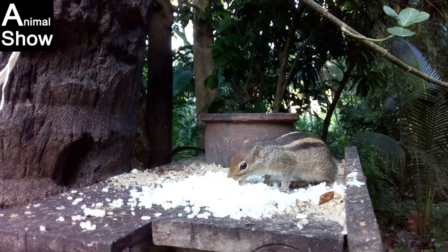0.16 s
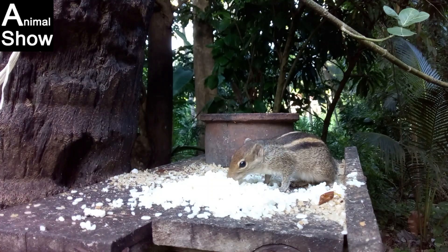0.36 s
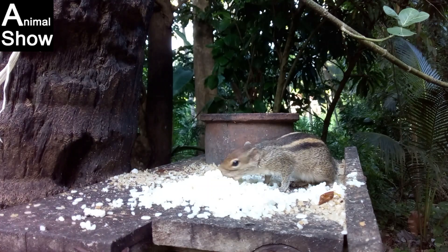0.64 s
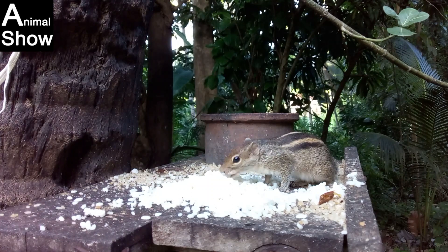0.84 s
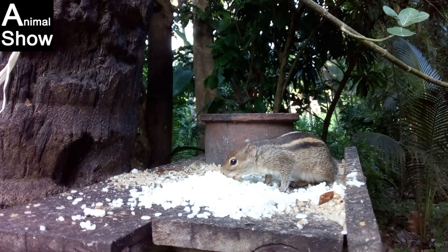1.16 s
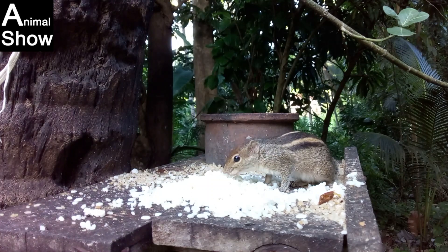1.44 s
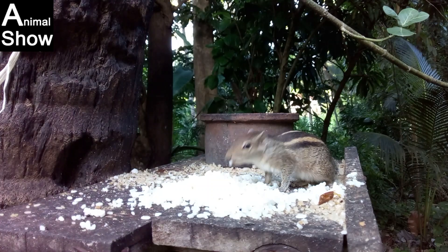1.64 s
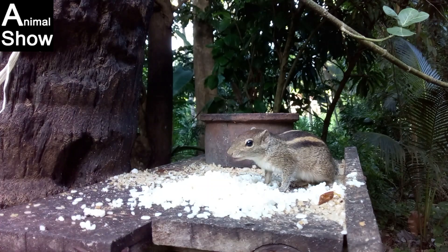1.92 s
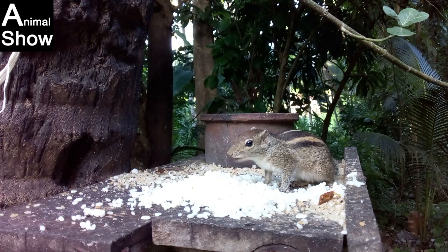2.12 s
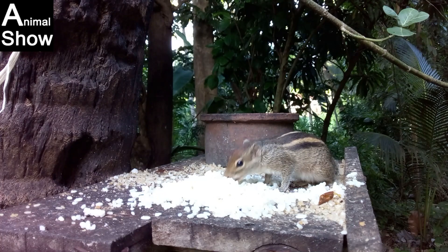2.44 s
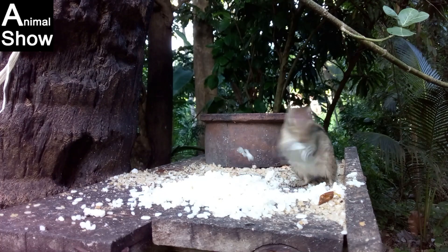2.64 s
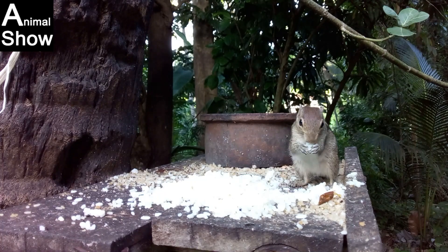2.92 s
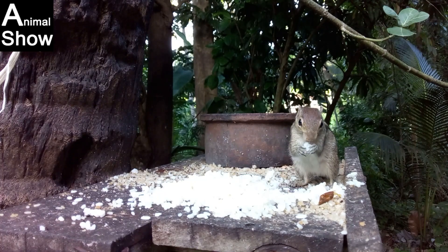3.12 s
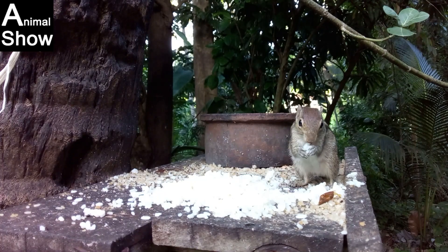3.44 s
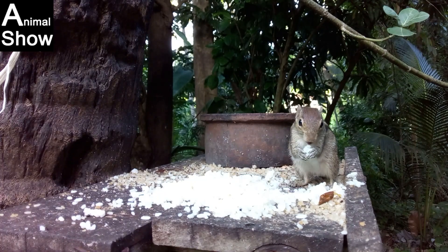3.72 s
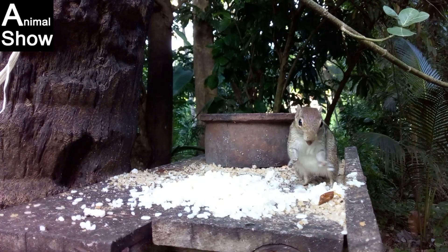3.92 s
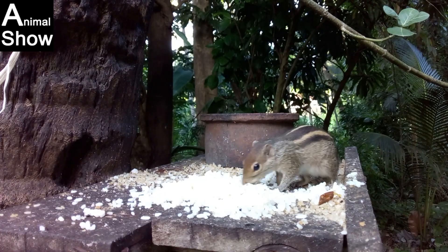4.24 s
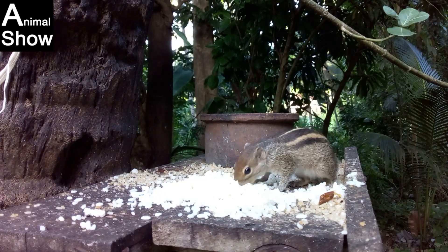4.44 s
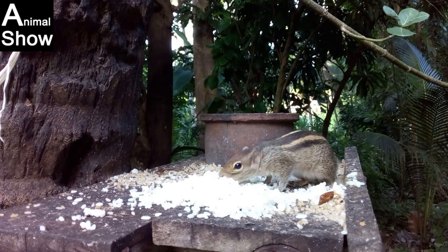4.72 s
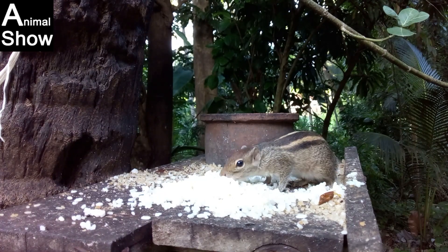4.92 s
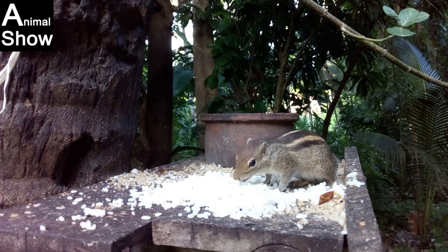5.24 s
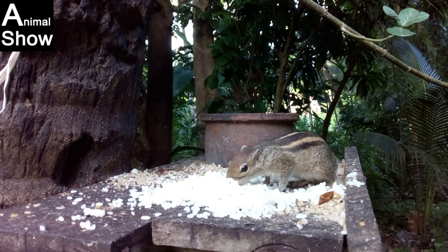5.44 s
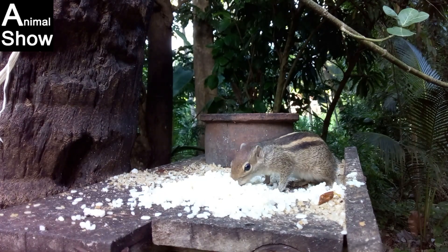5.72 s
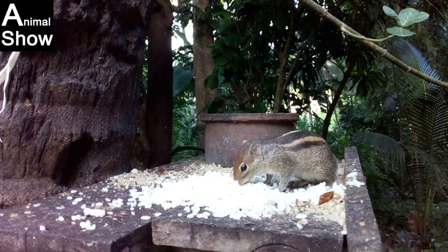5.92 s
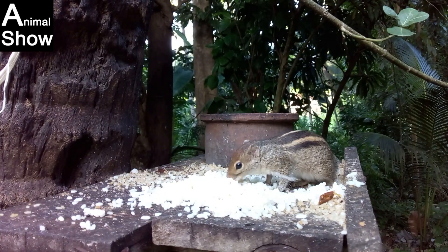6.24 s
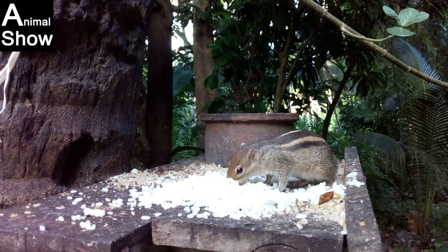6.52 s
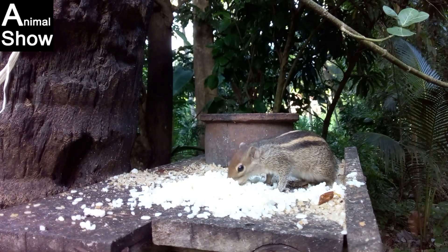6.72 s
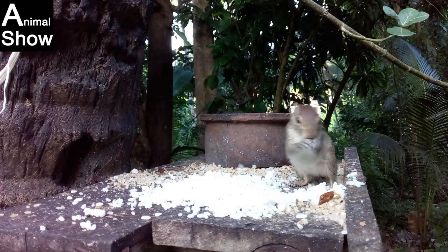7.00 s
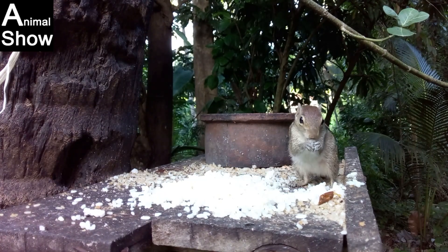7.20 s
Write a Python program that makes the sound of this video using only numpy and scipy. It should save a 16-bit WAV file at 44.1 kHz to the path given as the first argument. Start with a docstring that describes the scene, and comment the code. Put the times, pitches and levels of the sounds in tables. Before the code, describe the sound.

A small squirrel repeats one high chirp two or three times a second in a quiet garden. Each chirp flicks upward, echoes off hard surfaces and rings briefly in the leaves. Faint insects buzz over a low outdoor rumble. Distant birds join with thin whistles, and a few grains tick on a feeding table. The squirrel stops shortly before the end, leaving the birds.

```python
"""From the start, a small squirrel repeats one high chirp in a quiet garden, over buzzing insects and a
low outdoor rumble. Each chirp flicks upward and lands on a short, steady whistle; then walls and trunks
throw it back and the leaves let it ring on. After about two and a half seconds, small birds begin to
whistle far off. A grain ticks on a feeding table near three seconds, and three more around six.
The squirrel stops shortly before the end, and the birds have the last notes."""
import sys
import numpy as np
from scipy import signal
from scipy.fft import rfft, irfft
from scipy.io import wavfile

SR = 44100
rng = np.random.default_rng(int(sys.argv[2]) if len(sys.argv) > 2 else 0)


def file_out(sig):
    """Save sig as 16-bit WAV at sys.argv[1]."""
    # one column per channel
    cols = np.atleast_2d(sig).T
    # limit, then scale
    lim = np.clip(cols, -1, 1)
    pcm = np.round(lim * 32767).astype(np.int16)
    wavfile.write(sys.argv[1], SR, pcm)


N = 325015
TIME = np.arange(N) / SR

# The squirrel's chirps. Each row: start in seconds, level in dB compared with the other chirps.
CHIRPS = [(-0.21, 0.5), (0.1359, -1.5), (0.4678, -0.7), (0.768, -0.3), (1.0551, -0.4), (1.4062, -0.7),
          (1.784, -1), (2.227, -1.4), (2.7753, -2.0), (3.218, -1.8), (3.9197, -1.7), (4.2885, -0.8),
          (4.6603, 0), (5.0673, -0.6), (5.6511, -0.5), (6.2593, -1), (6.6265, -1.1)]

FLICK_FROM_HZ, FLICK_TO_HZ, FLICK_CLIMB_S = 1050, 1997, 0.0054
FLICK_DB, FLICK_ATTACK_S, FLICK_S, BREAK_S = -43, 0.0059, 0.0107, 0.0019
HELD_HZ, SAG_HZ_PER_S, PITCH_SPREAD_HZ = 2580, 0.7, 2.8
WHISTLE_DB, SWELL_DB, SWELL_S, HOLD_S, RELEASE_DB_PER_S = -32, 4.5, 0.0078, 0.0059, 1267
FLICK_JITTER, HELD_JITTER = 0.012, 0.0073   # unsteadiness, as a share of the pitch


def squirrel(opening_bright_db=2.5, relax_s=0.62, leaves_db=-16, stirred=0.65):
    """Every chirp meets the same hard surfaces, while part of its ring changes as the leaves stir."""
    out, echoes, still_leaves = np.zeros(N), hard_echoes(), foliage()
    for start, db in CHIRPS:
        # the pitch sinks a little over the run, and no two chirps land on quite the same note
        held_hz = HELD_HZ - SAG_HZ_PER_S * start + PITCH_SPREAD_HZ * rng.standard_normal()
        # the run opens with stronger overtones, which soon relax
        brightness_db = opening_bright_db * np.exp(-start / relax_s)
        call = from_db(db) * chirp(held_hz, brightness_db)
        leaves = (still_leaves + stirred * foliage()) / np.hypot(1, stirred)
        add(out, signal.fftconvolve(call, echoes), start)
        add(out, from_db(leaves_db) * signal.fftconvolve(call, leaves), start)
    return out


def chirp(held_hz, brightness_db, undertone_db=-33.5, hiss_db=-24.0, size=2048):
    """A tone and its overtones sweep up through the throat, which favours some pitches over others."""
    # How throat and mouth shape the voice. Each row: frequency in Hz, gain in dB.
    throat = [(1100, -40), (1600, -16), (1890, 1.1), (2580, 1.5), (3300, -7), (4200, -14.5), (5160, -1.0),
              (5900, -20), (7000, -20.5), (7740, -24), (10300, -29), (12900, -39), (15500, -43)]
    t = TIME[:size]
    # the flick climbs and levels off, then the voice breaks upward to the held pitch
    held = ramp(t, FLICK_S, BREAK_S)   # 0 in the flick, 1 in the whistle
    flick_hz = FLICK_TO_HZ + (FLICK_FROM_HZ - FLICK_TO_HZ) * np.exp(-(t / FLICK_CLIMB_S) ** 2)
    pitch = (1 - held) * flick_hz + held * held_hz
    jitter = (1 - held) * FLICK_JITTER + held * HELD_JITTER
    phase = 2 * np.pi * np.cumsum(pitch * (1 + jitter * drift(1530, size))) / SR
    voice = sum(from_db(at_hz(throat, k * pitch) + brightness_db * (k > 1)) * np.sin(k * phase)
                for k in range(1, 7))
    # every other vibration differs slightly, which adds a faint tone an octave below
    undertone = held * from_db(undertone_db) * np.sin(phase / 2)
    # a faint hiss is heard during each chirp
    hiss = from_db(hiss_db + FLICK_DB) * (1 + held) * rng.standard_normal(size)
    # the whistle swells, holds and dies away
    whistle_start = FLICK_S + BREAK_S
    whistle_db = WHISTLE_DB - SWELL_DB * (1 - ramp(t, whistle_start, SWELL_S))
    effort = from_db((1 - held) * FLICK_DB + held * whistle_db)
    release = from_db(-RELEASE_DB_PER_S * np.maximum(t - whistle_start - SWELL_S - HOLD_S, 0))
    soft_edges = ramp(t, 0, FLICK_ATTACK_S) * ramp(t[::-1], 0, FLICK_S)
    return ((voice + undertone) * effort + hiss) * release * soft_edges


def hard_echoes(first_s=0.01562, gap_s=0.00252, growth=1.082, loss_db_per_s=114, size=16384):
    """The direct sound, then echoes off walls and trunks; the far ones weaken as they travel."""
    # Strong echoes off the nearest surfaces. Each row: delay in seconds, level in dB.
    near = [(.00407, -4.0), (.0105, -7.0), (.01357, -5.0)]
    # farther trunks and walls stand more sparsely, so each gap between echoes is longer than the last
    delays = first_s + gap_s * (growth ** np.arange(20) - 1) / (growth - 1)
    far = [(delay, -7.0 - loss_db_per_s * delay) for delay in delays]
    hz = np.arange(size // 2 + 1) * SR / size
    return irfft(1 + sum(from_db(db) * np.exp(-2j * np.pi * hz * delay) for delay, db in near + far))


def foliage(build_s=0.052, low_ring_s=0.73, high_ring_s=0.26, split_hz=3800, size=32768):
    """Leaves scatter sound into a ring that builds up, then dies away, the high part first."""
    t = TIME[:size]
    scatter = rng.standard_normal(size)
    low = signal.sosfilt(signal.butter(2, split_hz, fs=SR, output="sos"), scatter)
    high = signal.sosfilt(signal.butter(2, split_hz, "high", fs=SR, output="sos"), scatter)
    tail = low * from_db(-60 * t / low_ring_s) - high * from_db(-60 * t / high_ring_s)
    build_up = 1 - np.exp(-(t / build_s) ** 2)
    return rms_one(tail * build_up) / np.sqrt(size)


def low_trail(level_db=-59.5, band_hz=(300, 850), lag_s=0.04, rise_s=0.0038, decay_s=0.091, size=16384):
    """A faint, dull rush follows each chirp."""
    out, t = np.zeros(N), TIME[:size]
    band = signal.butter(2, band_hz, "band", fs=SR, output="sos")
    rise_and_fall = (1 - np.exp(-t / rise_s)) * np.exp(-t / decay_s)
    for start, db in CHIRPS:
        rush = rms_one(signal.sosfilt(band, rng.standard_normal(size)))
        add(out, from_db(level_db + db) * rush * rise_and_fall, start + lag_s)
    return out


def birds(direct_db=-0.5, scatter_db=-4.5):
    """Small birds give thin, sliding whistles, blurred by distance."""
    # The birds' notes. Each row: start in seconds, length in seconds, first and last pitch in Hz,
    # level in dB before the note splits into direct and scattered sound.
    notes = [(2.456, 0.38, 5300, 5530, -74.5), (3.31, 0.36, 4090, 3520, -75.5),
             (3.384, 0.034, 790, 995, -59), (4.42, 0.19, 3470, 3440, -71), (4.718, 0.2, 3840, 3810, -67),
             (4.997, 0.21, 3130, 3160, -69), (5.42, 0.18, 3150, 3020, -69.5),
             (5.667, 0.34, 2910, 2860, -76.5), (6.988, 0.21, 3820, 4190, -67.5),
             (7.109, 0.22, 4165, 4380, -65.5), (6.997, 0.34, 1446, 1590, -76)]
    out = np.zeros(N)
    for start, length, first_hz, last_hz, db in notes:
        progress = np.minimum(TIME[:SR // 2] / length, 1)
        waver = 0.017 * from_db(-65.5 - db)   # share of the pitch: fainter notes are more blurred
        pitch = (first_hz + (last_hz - first_hz) * progress) * (1 + waver * drift(400, len(progress)))
        swell = np.sqrt(np.abs(np.sin(np.pi * progress)))
        add(out, from_db(db) * swell * np.sin(2 * np.pi * np.cumsum(pitch) / SR), start)
    return from_db(direct_db) * out + from_db(scatter_db) * signal.fftconvolve(out, foliage())[:N]


def grains(decay_s=0.00045, width_hz=2500, size=512):
    """Grains tick on the feeding table with tiny, dry snaps."""
    # The ticks. Each row: start in seconds, peak level in dB, pitch in Hz.
    ticks = [(2.901, -53, 11000), (5.804, -43.5, 7700), (6.103, -60, 11500), (6.156, -52, 7600)]
    out = np.zeros(N)
    for start, db, hz in ticks:
        burst = rng.standard_normal(size) * np.exp(-TIME[:size] / decay_s)
        snap = resonate(burst, hz, width_hz)
        add(out, from_db(db) * snap / np.abs(snap).max(), start)
    return out


def insects(unsteadiness=0.0052):
    """Each insect's scraping rings around one high pitch; some scrape in fast, even pulses."""
    # The insects. Each row: pitch in Hz, band width in Hz (each filter is set 1.33 times as wide),
    # pulses per second, pulse depth from 0 (smooth) to 1, level in dB.
    buzzers = [(6776, 330, 60.3, 0.4, -70.5), (6844, 326, 98, 0, -69.5), (9146, 520, 128.6, 0, -73.5),
               (9810, 580, 128.2, 0.4, -72.5)]
    out = np.zeros(N)
    for hz, width_hz, per_s, depth, db in buzzers:
        stroke = 2 * np.pi * np.cumsum(per_s * (1 + unsteadiness * drift(2.9, N))) / SR
        scrape = rng.standard_normal(N) * (1 + depth * np.cos(stroke)) ** 2
        filter_width_hz = 1.33 * width_hz
        buzz = resonate(resonate(scrape, hz, filter_width_hz), hz, filter_width_hz)
        out += from_db(db) * rms_one(buzz)
    return out


def air(wander_db=0.2, wander_per_s=5.0, fade_db_per_s=0.28, rumble_below_hz=1200):
    """A distant rumble and a faint hiss lie under everything, nearly steady."""
    # The outdoor background noise. Each row: frequency in Hz, level in dB per Hz.
    spectrum = [(22, -104), (45, -80.5), (62, -77.5), (100, -79.5), (170, -89.5), (300, -87.5),
                (600, -94.5), (1000, -102), (1600, -108), (3000, -112), (5500, -111), (8000, -118),
                (11000, -117), (15500, -119)]
    hz = np.arange(N // 2 + 1) * SR / N
    noise = irfft(rfft(rng.standard_normal(N)) * from_db(at_hz(spectrum, hz)), N) * np.sqrt(SR / 2)
    rumble = signal.sosfilt(signal.butter(1, rumble_below_hz, fs=SR, output="sos"), noise)
    # only the low part wanders and slowly fades
    swell_db = wander_db * drift(wander_per_s, N) - fade_db_per_s * (TIME - TIME.mean())
    return noise + rumble * (from_db(swell_db) - 1)


def from_db(db):
    """Turn decibels into a number to multiply by."""
    return 10 ** (np.asarray(db) / 20)


def at_hz(points, hz):
    """Read a level between a table's rows, giving every octave equal room."""
    known_hz, values = np.transpose(points)
    return np.interp(np.log(np.maximum(hz, 1)), np.log(known_hz), values)


def rms_one(x):
    """Scale a sound so its average power is 1."""
    return x / np.sqrt(np.mean(x ** 2) + 1e-20)


def ramp(t, start_s, length_s):
    """Go evenly from 0 to 1 over the given stretch."""
    return np.clip((t - start_s) / length_s, 0, 1)


def drift(per_s, size):
    """Wander by about 1 either way, heading for a new random value per_s times a second."""
    steps = rng.standard_normal(size)
    return np.interp(np.arange(size) * per_s / SR, np.arange(size), steps)


def resonate(x, hz, width_hz):
    """Let a sound ring at one pitch, weakening everything away from it."""
    r = np.exp(-np.pi * width_hz / SR)
    feedback = [1, -2 * r * np.cos(2 * np.pi * hz / SR), r * r]
    return signal.lfilter(np.array([1, 0, -1]) * (1 - r * r) / 2, feedback, x + 1e-18)


def add(out, sound, start_s):
    """Mix a sound in at its start time."""
    at = int(round(start_s * SR))
    first, last = max(at, 0), min(at + len(sound), N)
    if last > first:
        out[first:last] += sound[first - at:last - at]


def scene():
    """The whole garden, in one channel."""
    return (squirrel() + low_trail() + birds() + insects() + grains() + air())[None]


def record(dry, cutoff_hz=15650):
    """The very highest sounds are cut off steeply."""
    return signal.sosfilt(signal.ellip(12, 0.1, 70, cutoff_hz, fs=SR, output="sos"), dry)


dry = scene()
out = record(dry)
file_out(out)
```